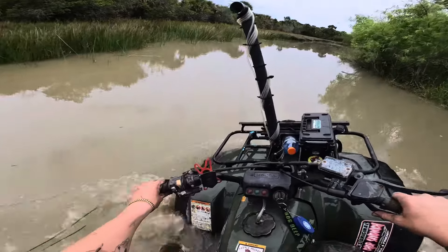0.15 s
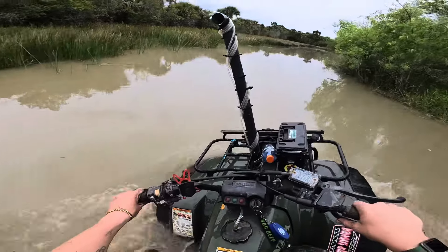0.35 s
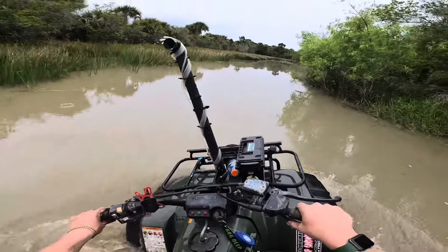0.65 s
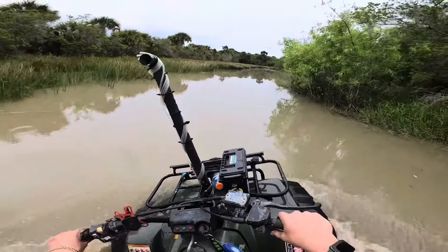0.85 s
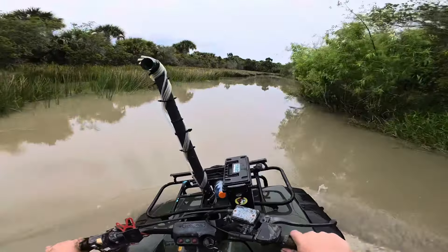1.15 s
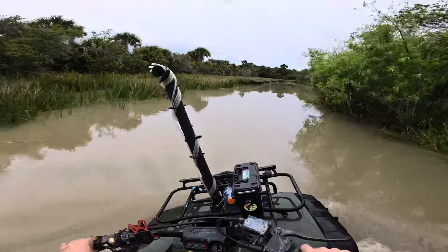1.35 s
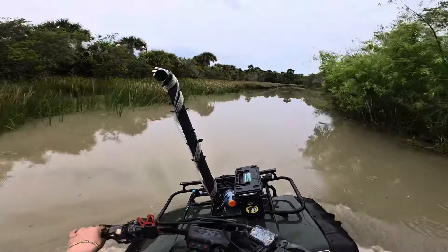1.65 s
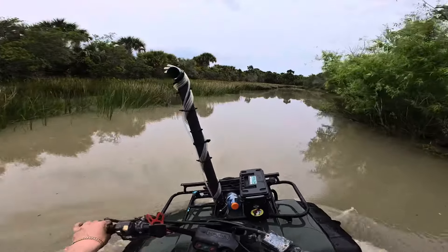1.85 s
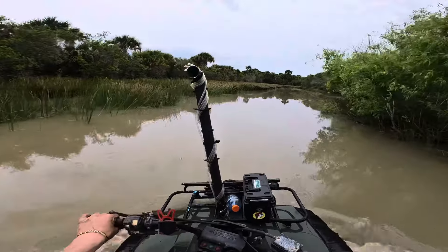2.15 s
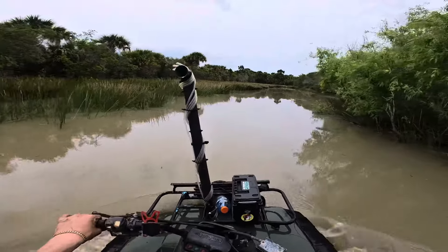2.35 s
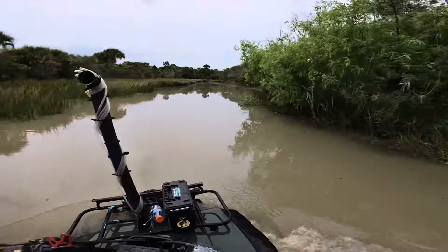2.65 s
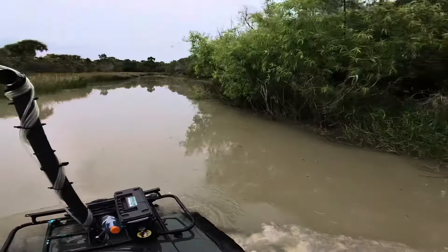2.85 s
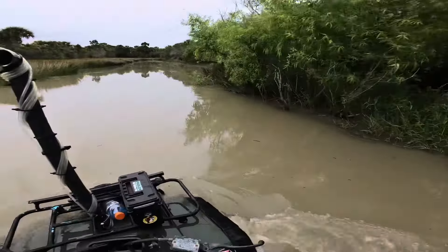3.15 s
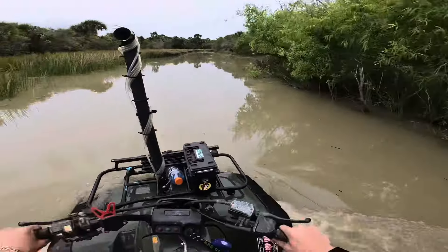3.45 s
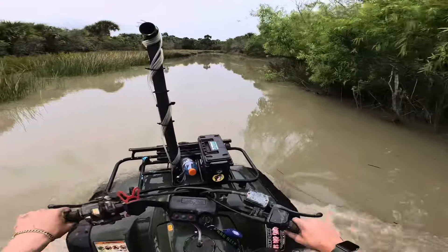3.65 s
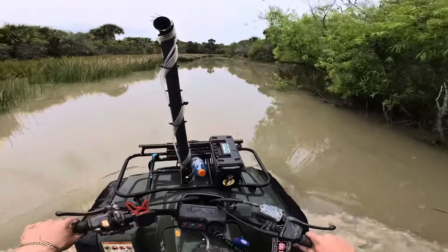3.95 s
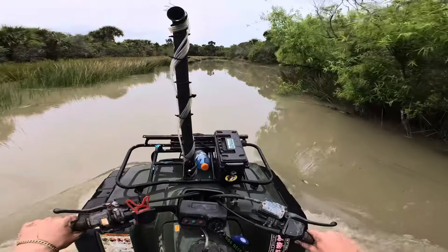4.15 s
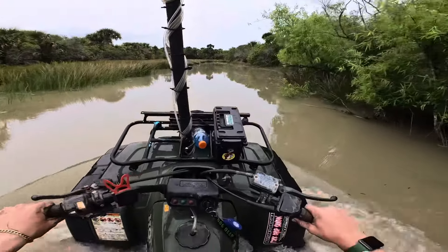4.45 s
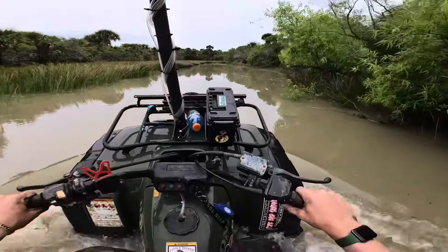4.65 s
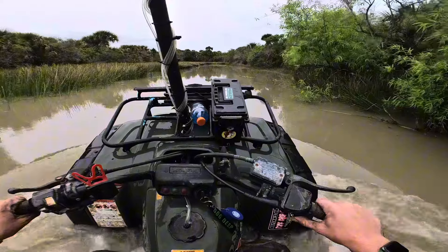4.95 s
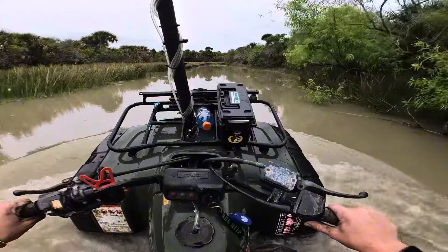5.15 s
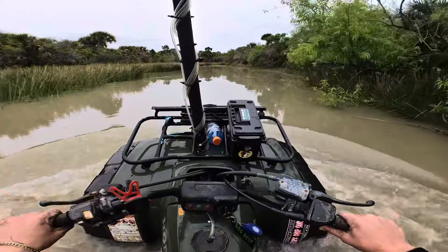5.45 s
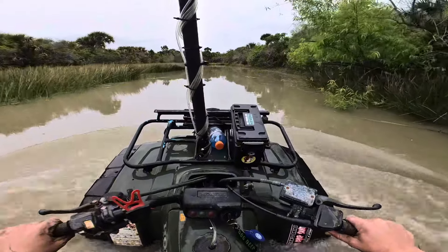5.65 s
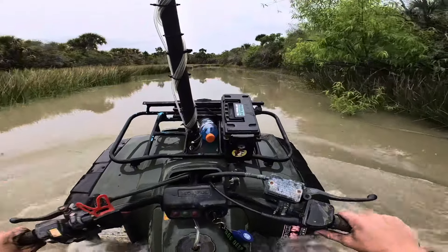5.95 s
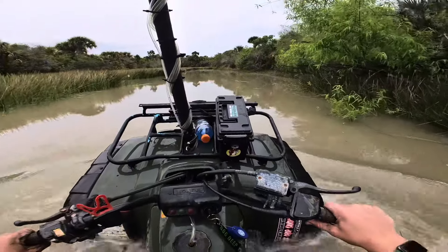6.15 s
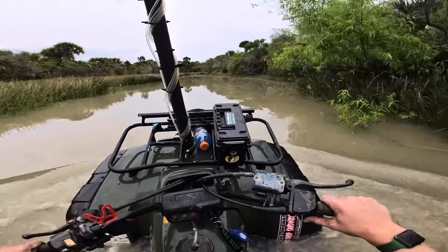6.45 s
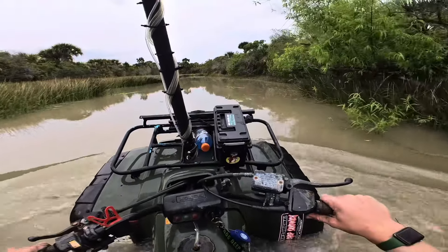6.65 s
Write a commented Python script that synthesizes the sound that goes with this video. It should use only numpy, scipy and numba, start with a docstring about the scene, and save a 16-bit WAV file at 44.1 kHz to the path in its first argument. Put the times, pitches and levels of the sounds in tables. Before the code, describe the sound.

From 0 to about 2.6 seconds a small single-cylinder engine runs steadily at roughly thirty pops a second, with a low hollow boom, ringing pipe, raspy gas puffs and a very faint mechanical whine. Quiet water wash sits beneath. Around 2.6 to 3.5 seconds water laps and covers the exhaust: the sharp rasp weakens, a stray strong puff escapes, and the tone becomes dark and blubbery. Revs climb from 3.3 to a peak near 4.4 seconds, a fast muffled growl with snapping gas pockets. At about 4.9 seconds the throttle drops and the engine sags to slow, heavy throbs by 5.4. It recovers briefly near 5.9, then bogs again, pulsing low and uneven to 6.8. From 4.6 onward churning hiss, fizz and round gulps are much louder. Close, dry, open-air helmet perspective, slightly saturated, little stereo width.

```python
"""Quad bike wading into deep water

A one-cylinder engine is heard from the rider's helmet. Each firing is a short crack and a slug of gas
that ring the exhaust pipe and the muffler; rasping noise follows. As the outlet dips under, the ring
sinks and dulls, the engine revs, bogs and throbs as gas bubbles. The water is flickering noise bands
(hiss) and rising decaying tones (fizz, gulps), growing louder. Levels in dB are ahead of the microphone."""
import sys
import numpy as np
from scipy import signal
from scipy.fft import rfft, irfft, next_fast_len
from scipy.io import wavfile
from scipy.ndimage import uniform_filter1d
from numba import njit

SR = 44100
rng = np.random.default_rng(int(sys.argv[2]) if len(sys.argv) > 2 else 0)


def put_to_file(sound):
    """Save the sound as 16-bit audio at rate SR, in the file named by the first command-line argument."""
    columns = np.atleast_2d(sound).T  # one column per channel
    safe = np.clip(columns, -1, 1)
    whole_steps = np.round(safe * 32767)
    wavfile.write(sys.argv[1], SR, whole_steps.astype(np.int16))


N = 300321
T = np.arange(N) / SR  # s

# Engine speed. Each row: time in seconds, firings per second.
FIRING_RATE = [(0.0, 29.87), (0.6, 30.58), (1.2, 30.09), (1.8, 30.08), (2.2, 31.33), (2.8, 29.85),
               (3.15, 30.18), (3.275, 32.15), (3.65, 35.0), (3.9, 40.52), (4.15, 39.26), (4.4, 44.42),
               (4.775, 41.98), (5.025, 32.94), (5.23, 21.8), (5.38, 19.2), (5.75, 27.8), (5.95, 29.3),
               (6.02, 23.2), (6.25, 18.9), (6.54, 23.6), (6.62, 19.5), (6.81, 17.3)]
# Engine levels with the throttle open. Each row: time in seconds, throb at the firing rate in dB, throb at
# the crank rate in dB, boom in dB, boom's octave in dB, pipe ring in dB, gas puff in dB before GAS_TRIM_DB.
ENGINE_LEVELS = [(0.0, -50, -32, -12.5, -29.5, -30, -30), (1.4, -37.5, -37.5, -12.5, -31, -29, -32.5),
                 (1.75, -46, -33, -13, -24.5, -24, -32), (2.45, -49.5, -38, -12.5, -24, -25, -33),
                 (2.72, -43, -35.5, -12.5, -25.5, -25.5, -41.5), (2.98, -40.5, -30, -11.5, -31, -19, -48),
                 (3.12, -35.5, -28, -9, -17.5, -25, -54), (3.28, -34, -19.5, -9, -19.5, -19.5, -51),
                 (3.55, -19.5, -13.5, -11, -13, -19.5, -41), (3.85, -34, -12.5, -10, -15, -22.5, -38.5),
                 (4.1, -28.5, -12, -10.5, -15, -20.5, -43.5), (4.45, -21, -17, -8, -15, -42.5, -42.5),
                 (4.6, -20, -10.5, -11, -24.5, -31, -47), (4.8, -28.5, -11, -11.5, -23, -36, -46.5),
                 (5.05, -12, -10, -11.5, -61.5, -40, -45), (5.25, -8.5, -8, -19.5, -44.5, -44.5, -41),
                 (5.5, -23, -12.5, -19.5, -43, -40, -48), (5.68, -13.5, -13.5, -17, -42.5, -35.5, -52),
                 (5.85, -10, -20, -15.5, -51, -31.5, -44.5), (5.96, -10.5, -13.5, -13.5, -45.5, -37, -43),
                 (6.3, -35.5, -6.5, -18.5, -53, -39, -39), (6.5, -27.5, -7, -16.5, -24.5, -33.5, -43.5),
                 (6.7, -31, -7.5, -19.5, -42.5, -41.5, -45.5), (6.81, -27, -17, -18.5, -52.5, -45, -40)]
# Water levels. Each row: time in seconds, churn in dB, gurgle below about 700 Hz against the churn in dB.
WATER_LEVELS = [(0.0, -43, -1.5), (0.65, -41, 0.5), (1.1, -42, 0.5), (1.74, -43.5, -4.5), (2.3, -43.5, 2),
                (2.75, -45, 5.5), (3.22, -40, 2), (3.51, -35.5, 4.5), (3.73, -34.5, 7.5), (4.06, -38.5, -1),
                (4.4, -33, 3.5), (4.61, -29, 0.5), (4.91, -26, -4.5), (5.2, -27.5, -2), (5.48, -27, -6),
                (5.72, -23.5, -4.5), (5.9, -26.5, 0), (5.97, -26.5, -5), (6.03, -28.5, -4.5),
                (6.13, -32.5, -0.5), (6.25, -29, -7.5), (6.5, -30.5, -0.5), (6.57, -35, 1.5),
                (6.7, -33.5, -4.5), (6.81, -29, -9)]
# Exhaust pipe resonances in air. Each row: centre in Hz, width in Hz, relative level in dB.
PIPE_MODES = [(436.5, 77, -1.5), (646, 65, -1), (740, 72, 0), (948, 127, 1), (1210, 280, -7),
              (1486, 30, -4.5), (1960, 55, -20), (2350, 250, -9.5)]
# Spectrum of the gas rasp. Each row: frequency in Hz, relative level in dB per Hz.
GAS_SPECTRUM = [(290, -37.5), (500, -7.5), (691, -12.5), (756, -8.5), (828, -16.5), (930, 2.5),
                (1040, -3.5), (1250, -14), (1480, -9), (1650, -12.5), (2940, -23.5), (5540, -25),
                (11000, -56), (14300, -88), (22000, -120)]
# Spectrum of the churning water. Each row: frequency in Hz, relative level in dB per Hz.
WATER_SPECTRUM = [(60, -4), (150, -11.5), (300, -14), (600, -17.5), (900, -19), (1250, -20), (2000, -22),
                  (2600, -25), (3200, -26), (4300, -26), (6200, -30), (8000, -39.5), (11000, -53.5),
                  (14000, -99)]
# Loud gulps of water. Each row: start in seconds, peak in dB, starting pitch in Hz.
GULP_EVENTS = [(4.602, -10.5, 835), (4.724, -19, 1110), (4.988, -14, 750), (5.188, -15, 1240),
               (5.433, -11.5, 1240), (5.526, -16.5, 383), (5.692, -14, 836), (5.756, -14, 876),
               (5.959, -18.5, 813), (6.03, -17.5, 482), (6.196, -15, 1194), (6.246, -13.5, 1070),
               (6.268, -18.5, 450), (6.321, -17, 1220), (6.37, -18.5, 479), (6.446, -17, 1026),
               (6.692, -21.5, 1256)]
# Difference between the two ports. Each row: frequency in Hz, side against mid in dB.
PORT_DIFFERENCE = [(500, -95), (1000, -55), (1900, -33), (2800, -11.5), (5500, -8.5), (7000, -30),
                   (11000, -40)]
# Response of the microphone port. Each row: frequency in Hz, gain in dB.
HOUSING_RESPONSE = [(8, -18), (24, 1), (2700, 0), (3200, 1), (3700, -1.5), (4350, -4.5), (4950, 1.5),
                    (5500, 0.5)]
# The rider lets the throttle go. Each row: start in seconds, length in seconds, change of throb in dB,
# change of boom in dB.
THROTTLE_LIFTS = [(4.887, 0.67, -12.5, 1.5), (5.966, 0.41, -8.5, -9.5), (6.532, 0.22, -17, -7.5)]
# Firings that stand out. Each row: time in seconds, extra pipe ring in dB, extra gas in dB, hard ring in dB.
STRONG_FIRINGS = [(.64, 3, 2, -39), (.835, 4.5, 2.5, -40), (.965, 5.5, 3, -35.5), (1.2, 5, 0.5, -35),
                  (1.565, -4, 2, -36), (1.8, 2.5, 0.5, -35), (1.93, 2, 0, -54), (2.03, 2.5, 3.5, -42),
                  (2.185, 0, 0.5, -39.5), (2.315, 0, -2, -29), (2.35, 1, -1.5, -28), (2.38, -1.5, 3.5, -31),
                  (2.78, 5.5, 5, -48), (2.845, 2.5, -4, -59.5), (2.915, 5, 0, -44), (3.015, 6.5, 4, -47),
                  (3.275, -1.5, 14.5, -52), (3.305, 3.5, 3, -40.5), (3.4, 5.5, -4, -52),
                  (3.49, 4.5, 6.5, -37.5), (3.515, 4.5, 4, -49)]
# Snap of a drowned gas pocket that swells and lets go at once. Each row: time in seconds, level in dB.
SNAP_LEVELS = [(3.1, -48), (3.35, -29), (3.7, -22.5), (4.0, -22.5), (4.3, -24), (4.6, -23.5), (4.85, -24),
               (5.1, -41), (5.5, -33.5), (5.9, -31.5), (6.1, -48), (6.5, -31), (6.81, -38.5)]
# Muffler ring in air. Each row: time in seconds, width in Hz, second and third slug against the first in dB.
MUFFLER_RING = [(0, 38, -17.5), (.8, 40.5, -15.5), (1.5, 48.7, -15), (2.1, 58.5, -15), (2.7, 60, -17),
                (3.2, 51.4, -5), (3.6, 50.1, -22.5)]

FIRST_TURN = .92  # engine cycles already run at the start
PIPE_TRIP_S = 0.006664  # there and back along the exhaust
OUTLET_DIPS_S, DIP_LENGTH_S = 3.25, 0.3  # the exhaust outlet goes under
WAVE_REACHES_S, LAP_LENGTH_S = 2.62, 0.13  # the bow wave laps the outlet
DEEP_S, DEEP_LENGTH_S = 5.4, 0.2  # the deepest water
LAPPED_CRACK_S, DROWNED_CRACK_SHARE = 0.002733, 0.39  # lapping delays the crack; drowning undoes this share
WET_ECHO_DB = -15.5  # water swallows the echoes in the pipe
WET_PIPE_SINK, WET_PIPE_SMEAR = 0.15, 1.6  # pipe resonances under water: share lower, extra widths
PIPE_WANDER, PIPE_BLOW_DB, PIPE_DRIFT_DB = .015, 1.5, 2.0  # scales of pitch, blow and slow level scatter
BARK_HZ, BARK_WIDTH_HZ, BARK_DB = 387, 380, -6  # broad bark of the drowned outlet, gain
BLUB_HZ, BLUB_SCATTER, BLUB_DB = 576, 0.25, -5  # each drowned blow rings a gas pocket of its own size
SLUG_S, SLUG_WET_S = 0.00431, 0.008  # the gas leaves later once the wave laps the outlet
DEEP_SLUG_LEAD_S, DEEP_THROB_LEAD_S = 0.0064, .003  # in the deepest water it breaks out sooner
DRY_BOOM_HZ = 151.5  # muffler ring in air
WET_BOOM_HZ, WET_BOOM_PER_FIRING = 80.7, 0.91  # under water the ring climbs with the speed
SHUT_BOOM_ORDER = 3.5  # with the throttle shut it slides on this multiple of the firing rate
DEEP_BOOM_HZ = 126  # in the deepest water the ring no longer follows the speed
THUMP_DB, THUMP_WET_DB = -11, -26  # gain of the bare slug added to the ring it starts
GROWL_HZ, GROWL_PER_FIRING, GROWL_UPPER_DB = 100.7, 4.04, -2.5  # drowned growl climbs with the speed
GAS_TRIM_DB = -2.5
HARD_RING_HZ, HARD_RING_WIDTH_HZ = 1750, 190
SNAP_S, SNAP_SWELL_S, SNAP_HZ = .003, 0.0027, 396
SPRAY_DB = -9  # spray above about 3 kHz, against the churn
SHUT_S, REOPEN_SHARE = 0.023, 0.44  # the throttle shuts at once, reopens over the last share of the lift
TOP_HZ = 11500


def undb(db):
    """Convert a level in dB to an amplitude ratio."""
    return 10 ** (np.asarray(db) / 20)


def curves(table):
    """Interpolate the columns of a table linearly, one value a sample."""
    s, *columns = np.transpose(table)
    return [np.interp(T, s, c) for c in columns]


def even(x):
    """Normalize the running rms over a few engine cycles to 1."""
    power = uniform_filter1d(uniform_filter1d(x ** 2, size=6000), size=6000)
    return x / np.sqrt(power + 1e-12)


def walk(rate):
    """Slow random modulation: normal values held 1 / rate s and slewed twice."""
    k = int(SR / rate)
    steps = np.repeat(rng.standard_normal(N // k + 1), k)
    return uniform_filter1d(uniform_filter1d(steps, k), k)[:N]


@njit
def svf(x, hz, width, high):
    """State-variable resonator: band-pass (gain 1 at the centre) or high-pass, moving centre and width."""
    y, b, l = np.empty(len(x)), 0., 0.
    for i in range(len(x)):
        g, k = np.tan(np.pi * hz[i] / SR), width[i] / hz[i]
        v = (b + g * (x[i] - l)) / (1 + g * (g + k))
        y[i] = x[i] - k * v - l - g * v if high else k * v
        b, l = 2 * v - b, l + 2 * g * v
    return y


def band(x, hz, width_hz):
    """Damped resonance: a single band-pass."""
    return svf(x, hz + 0 * T, width_hz + 0 * T, False)


def above(x, hz):
    """Phase cancellation: a steep high-pass run forwards, then backwards, has no delay."""
    y = svf(x, hz, np.sqrt(2) * hz, True)[::-1].copy()
    return svf(y, hz[::-1].copy(), np.sqrt(2) * hz[::-1], True)[::-1]


def shape(x, spectrum):
    """Linear filtering: weight the spectrum of x by (Hz, dB) points."""
    size = next_fast_len(N + 8192)
    hz = np.maximum(np.fft.rfftfreq(size, 1 / SR), 1)
    points_hz, points_db = np.array(spectrum).T
    gain = undb(np.interp(np.log(hz), np.log(points_hz), points_db))
    mirrored_tail = x[:-4097:-1] * np.linspace(1, 0, num=4096)
    return irfft(rfft(np.r_[x, mirrored_tail], size) * gain, size)[:N]


def colour(x, spectrum):
    """Spectral shaping with the rms above 1 kHz normalized to 1."""
    y = shape(x, spectrum)
    return y / np.std(shape(y, [(900, -60), (1100, 0)]))


def firing_cycle():
    """Combustion timing: integrated speed gives the cycle and the time since the valve opened."""
    (rate,) = curves(FIRING_RATE)
    turns = FIRST_TURN + np.cumsum(rate) / SR
    cycle = turns.astype(int)
    chance = rng.standard_normal((cycle[-1] + 1, 5))[cycle].T
    since = (turns - cycle) / rate
    since = np.maximum(since - 0.0003 * (1 + np.tanh(chance[3])), 0)  # the burn is a little early or late
    extra = np.zeros((cycle[-1] + 1, 3)) + (0, 0, -90)
    strong = np.array(STRONG_FIRINGS)
    extra[cycle[(strong[:, 0] * SR).astype(int)]] = strong[:, 1:]
    return rate, turns, cycle, chance, since, extra[cycle].T


def immersion():
    """Water level at the outlet: how far it is lapped, drowned and in the deepest water (0-1 each)."""
    lapped = np.clip((T - WAVE_REACHES_S) / LAP_LENGTH_S, 0, 1)
    drowned = np.clip((T - OUTLET_DIPS_S) / DIP_LENGTH_S, 0, 1)
    deep = np.clip((T - DEEP_S) / DEEP_LENGTH_S, 0, 1)
    return lapped, drowned, deep


def valve_crack(since, size, lapped, drowned):
    """Impulsive pressure release: a quick, slightly ragged pulse and its echoes along the pipe."""
    opening = .001 + LAPPED_CRACK_S * (lapped - DROWNED_CRACK_SHARE * drowned)
    crack = 0
    for k, gain in enumerate((1, .6, .25)):
        pulse = np.exp(-((since - opening - k * PIPE_TRIP_S) / 0.00044) ** 2)
        crack = crack + gain * undb(k * WET_ECHO_DB * drowned) * pulse
    ragged = (since > 0) * np.exp(-since / 0.0056) * rng.standard_normal(N)
    crack = crack + (0.18 - 0.11 * drowned) * ragged
    return band(crack * undb(0.69 * size), 880, 3000)


def slug_pulse(since, delay, size, drowned):
    """Gas discharge: a smooth pulse, broader under water, of random size."""
    pulse = np.exp(-((since - delay) / (0.0009 + 0.00071 * drowned)) ** 2)
    return pulse * undb(0.62 * size)


def pipe_ring(crack, slug, cycle, pocket, drowned):
    """Modal excitation: the crack rings pipe modes that shift and swell; drowned, a bark and blub join."""
    own = rng.standard_normal((cycle[-1] + 1, len(PIPE_MODES)))[cycle].T
    pipe = 0
    for k, (hz, width, db) in enumerate(PIPE_MODES):
        gain = undb(db + PIPE_BLOW_DB * own[k] + PIPE_DRIFT_DB * walk(3.16))
        mode_hz = hz * (1 + PIPE_WANDER * walk(6)) * (1 - WET_PIPE_SINK * drowned)
        mode = band(crack, mode_hz, width * (1 + WET_PIPE_SMEAR * drowned))
        pipe = pipe + (-1) ** k * gain * mode
    bark = undb(BARK_DB) * band(slug, BARK_HZ, BARK_WIDTH_HZ)
    pipe = (1 - 2 * drowned) * pipe - drowned * bark  # the polarity turns over under water
    pocket_hz = BLUB_HZ * np.exp(BLUB_SCATTER * np.tanh(pocket))
    return pipe + drowned * undb(BLUB_DB) * band(crack, pocket_hz, 120)


def muffler_boom(slug, repeats, rate, shut, drowned, deep):
    """Cavity resonance: gas slugs ring the muffler; water round the outlet damps and retunes it."""
    width_hz, again_db = curves(MUFFLER_RING)
    slugs = slug - undb(again_db) * repeats
    in_air = band(band(slugs, DRY_BOOM_HZ, width_hz), 1.117 * DRY_BOOM_HZ, 94)
    in_air = in_air + undb(-5.0) * band(slug, 95.8, 24)
    open_hz = WET_BOOM_HZ + WET_BOOM_PER_FIRING * rate
    wet_hz = (1 - shut) * open_hz + shut * SHUT_BOOM_ORDER * rate
    wet_hz = wet_hz + deep * (DEEP_BOOM_HZ - wet_hz)
    under_water = band(band(slug, wet_hz, 50), wet_hz, 70)
    boom = (1 - drowned) * in_air + drowned * under_water
    thump = undb(THUMP_DB + (THUMP_WET_DB - THUMP_DB) * drowned) * slug
    return above(boom + thump, (2.45 - 0.49 * shut) * rate)


def muffler_octave(slug, rate, drowned):
    """Higher cavity mode: an upper ring near the boom's octave, which under water climbs with speed."""
    growl_hz = GROWL_HZ + GROWL_PER_FIRING * rate
    octave_hz = 1.92 * DRY_BOOM_HZ + drowned * (growl_hz - 1.96 * DRY_BOOM_HZ)
    octave = band(band(slug, octave_hz, 110 - 70 * drowned), octave_hz, 240)
    upper = band(band(slug, 1.1 * growl_hz, 40), 1.5 * growl_hz, 120)
    return octave + drowned * undb(GROWL_UPPER_DB) * upper


def gas_throb(lag, throb_db, crank_db):
    """Volume pumping: swelling gas pockets push the water at the firing and crank rates."""
    firing = undb(throb_db) * np.cos(2 * np.pi * (lag + 0.073))
    crank = undb(crank_db) * np.cos(2 * np.pi * (2 * lag + 0.029))
    return -np.sqrt(2) * (firing + crank)  # the table levels are rms


def gas_rasp(since, size, gas_db):
    """Turbulent jet noise: coloured noise gated by each blow; returns two unrelated versions."""
    decay = np.exp(-(since / 0.011) ** 2) + 0.22 * np.exp(-since / 0.004)
    puff = even((1 - np.exp(-since / 0.00067)) * decay * undb(2.0 * size))
    level = undb(gas_db + GAS_TRIM_DB)
    return [level * puff * colour(rng.standard_normal(N), GAS_SPECTRUM) for _ in range(2)]


def valve_gear():
    """Narrow-band resonance: the valve gear and chain sing as filtered noise."""
    sing = band(band(rng.standard_normal(N), 4920, 460), 4920, 460)
    return undb(-60.0 + 2.5 * walk(24) + 4.5 * walk(5)) * even(sing)


def water_hiss():
    """Turbulent noise: half-octave-spaced bands flicker separately; returns it and an unrelated twin."""
    swell, hiss = walk(3), 0
    for hz in 120 * 2 ** np.arange(0, 6.6, .5):
        flicker = undb(0.55 * swell + 3.66 * walk(25) + 0.73 * walk(7))
        hiss = hiss + flicker * band(rng.standard_normal(N), hz, 0.46 * hz)
    hiss = colour(hiss, [(50, 0), (12000, -24)])
    twin = colour(undb(4.0 * walk(20)) * rng.standard_normal(N), [(50, 0.0057), (12000, 0.0024)])
    return hiss, twin


@njit
def bubbles(start, hz, cycles, size, glide, count):
    """Bubble resonance: short rings that rise in pitch while they die."""
    out = np.zeros(count)
    for j in range(len(start)):
        length = int(cycles[j] * SR / hz[j])
        phase = 0.
        for i in range(min(length, count - start[j])):
            phase += 2 * np.pi * hz[j] * (1 + glide * i / length) / SR
            out[start[j] + i] += size[j] * np.sin(phase) * np.exp(-5. * i / length)
    return out


def froth():
    """Superposition of many small bubbles at random times, pitches and sizes, heard as fizz."""
    when, pitch, cycles, loud = rng.random((9000, 4)).T
    hz = 300 * 25 ** pitch
    size = undb(-3.0 * np.log(np.maximum(loud, .04))) * np.sqrt(hz / 1000)
    return bubbles((when * N).astype(np.int64), hz, 8 + 50 * cycles ** 2, size, .15, count=N)


def flow(x, churn_db, gurgle_db):
    """Band balance: spray above about 3 kHz and gurgle below about 700 Hz have their own levels."""
    x = colour(x, WATER_SPECTRUM)
    spray = shape(x, [(2700, -60), (3500, 0)])
    gurgle = shape(x, [(600, 0), (1000, -30)])
    levelled_spray = undb(SPRAY_DB) * spray / np.std(spray)
    return undb(churn_db) * (x - spray + levelled_spray + (undb(gurgle_db) - 1) * gurgle)


def hard_ring(crack, hard_db):
    """Selective excitation: a high resonance of the crack, raised at firings that stand out."""
    return undb(hard_db) * even(band(crack, HARD_RING_HZ, HARD_RING_WIDTH_HZ))


def pocket_snap(since):
    """Sudden release: a pressure swells exponentially, stops at once and rings a broad resonance."""
    swelling = (since < SNAP_S) * np.exp((since - SNAP_S) / SNAP_SWELL_S)
    snap = band(band(swelling, SNAP_HZ, 800), SNAP_HZ, 2600)
    return undb(*curves(SNAP_LEVELS)) * even(snap)


def gulps():
    """Large-bubble resonance: single loud rings, each gliding up slightly as it decays."""
    s, gulp_db, gulp_hz = np.transpose(GULP_EVENTS)
    return bubbles((s * SR).astype(np.int64), gulp_hz, 30 + 0 * s, undb(gulp_db), 0.065, count=N)


def lifts():
    """Load removal: how far the throttle is shut (0-1), and the change of throb and boom in dB."""
    shut = []
    for s, length, *_ in THROTTLE_LIFTS:
        closing = (T - s) / SHUT_S
        reopening = (s + length - T) / (REOPEN_SHARE * length)
        shut.append(np.clip(np.minimum(closing, reopening), 0, 1))
    shut = np.array(shut)
    throb_change_db, boom_change_db = np.array(THROTTLE_LIFTS)[:, 2:].T @ shut
    return shut.sum(axis=0), throb_change_db, boom_change_db


def engine():
    """Source and resonator: blows drive pipe, muffler and gas; returns sound and a twin of its gas noise."""
    rate, turns, cycle, chance, since, (ring_db, puff_db, hard_db) = firing_cycle()
    lapped, drowned, deep = immersion()
    throb_db, crank_db, boom_db, octave_db, pipe_db, gas_db = curves(ENGINE_LEVELS)
    shut, throb_change_db, boom_change_db = lifts()
    crack_size, slug_size, puff_size, _, pocket = chance
    crack = valve_crack(since, crack_size, lapped, drowned)
    late = SLUG_S + (SLUG_WET_S - SLUG_S) * lapped
    slug = -slug_pulse(since, late - DEEP_SLUG_LEAD_S * deep, slug_size, drowned)
    repeats = sum(slug_pulse(since, late + k * PIPE_TRIP_S, slug_size, drowned) for k in (1, 2))
    pipe = pipe_ring(crack, slug, cycle, pocket, drowned)
    boom = muffler_boom(slug, repeats, rate, shut, drowned, deep)
    rings = undb(pipe_db + ring_db) * even(pipe)
    rings = rings + undb(boom_db + boom_change_db) * even(boom)
    rings = rings + undb(octave_db) * even(muffler_octave(slug, rate, drowned))
    rings = rings + hard_ring(crack, hard_db) + pocket_snap(since)
    lag = turns - (late - DEEP_THROB_LEAD_S * deep) * rate  # in firings
    throb = undb(throb_change_db) * gas_throb(lag, throb_db, crank_db)
    gas, twin = gas_rasp(since, puff_size, gas_db + puff_db)
    return throb + rings + gas + valve_gear(), twin


def water():
    """Turbulence and bubbles: hiss, fizz, gurgle and gulps; returns the sound and a twin of its hiss."""
    churn_db, gurgle_db = curves(WATER_LEVELS)
    hiss, twin = water_hiss()
    fizz = froth()
    wash = flow(hiss + undb(-2.0) * fizz / np.std(fizz), churn_db, gurgle_db)
    return wash + gulps(), flow(twin, churn_db, gurgle_db)


def scene():
    """Mid and side: engine and water lie straight ahead; mainly the 3-6 kHz band differs between ports."""
    (motor, motor_twin), (wash, wash_twin) = engine(), water()
    side = shape(motor_twin + wash_twin, PORT_DIFFERENCE)
    return motor + wash + np.array([side, -side])


def record(dry):
    """Saturation and low-pass: the microphone rounds peaks, its housing colours them, the top is cut."""
    soft = np.array([shape(0.85 * np.tanh(channel / 1.13), HOUSING_RESPONSE) for channel in dry])
    soft = signal.sosfilt(signal.butter(4, 9500, fs=SR, output="sos"), soft)
    return signal.sosfilt(signal.ellip(8, .2, 60, TOP_HZ, fs=SR, output="sos"), soft)


dry = scene()
out = record(dry)
put_to_file(out)
```